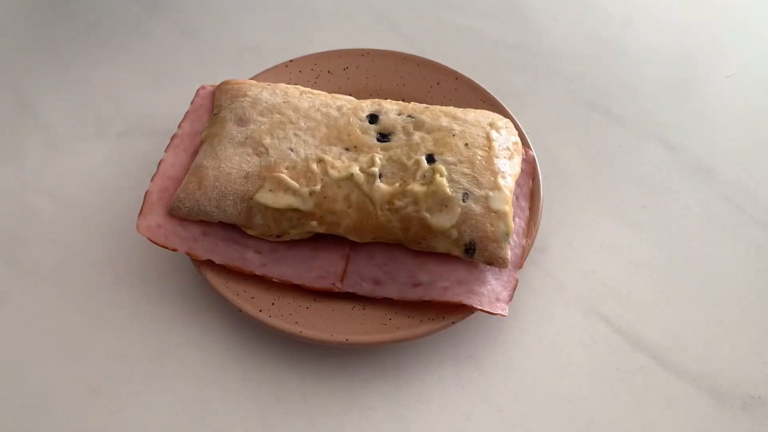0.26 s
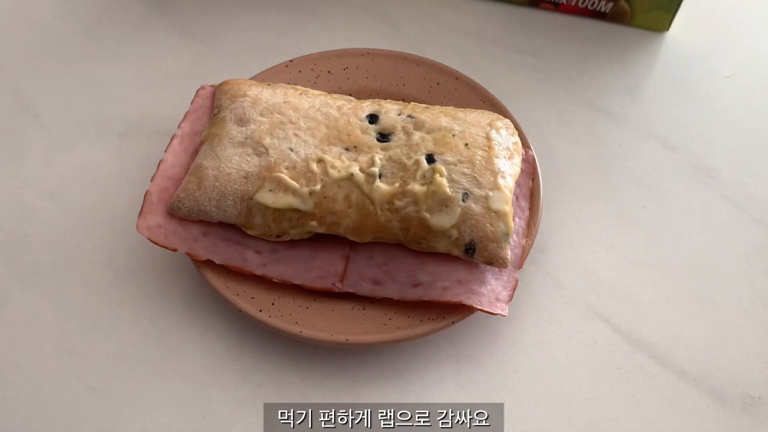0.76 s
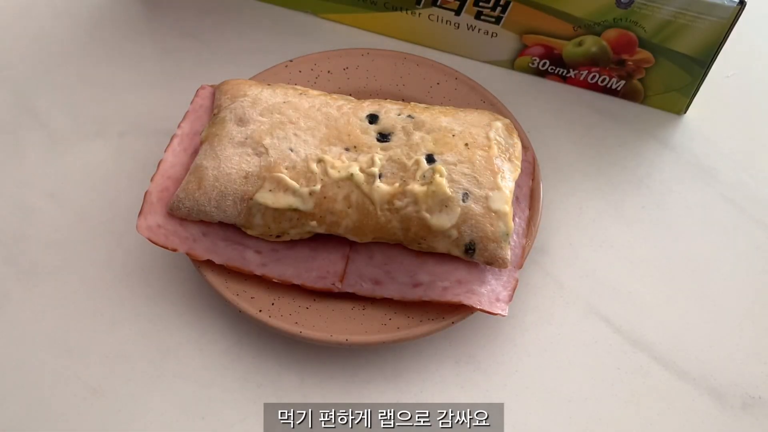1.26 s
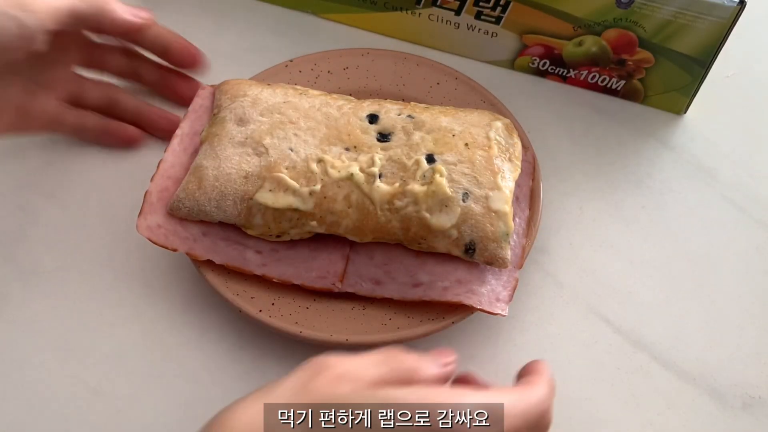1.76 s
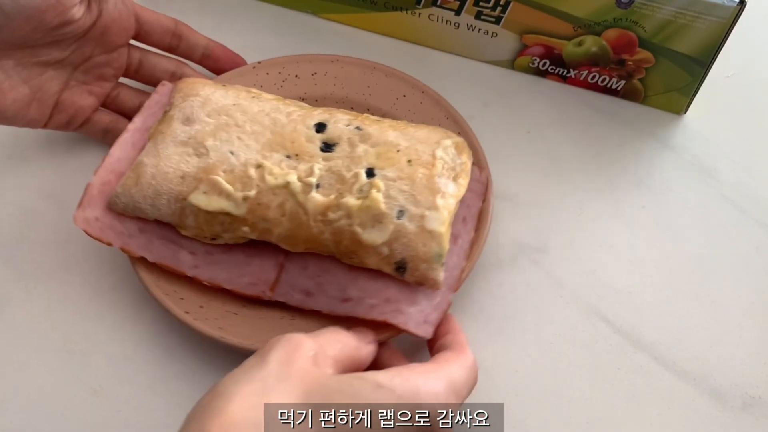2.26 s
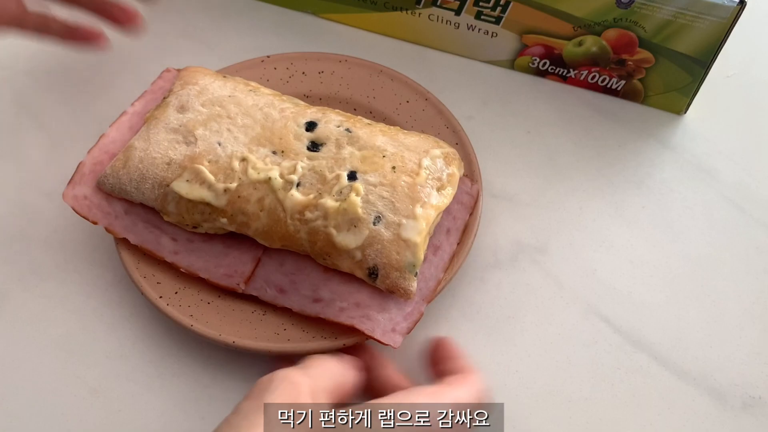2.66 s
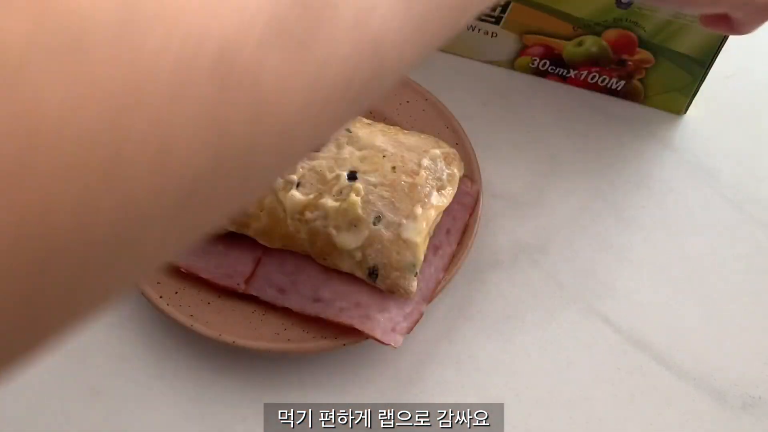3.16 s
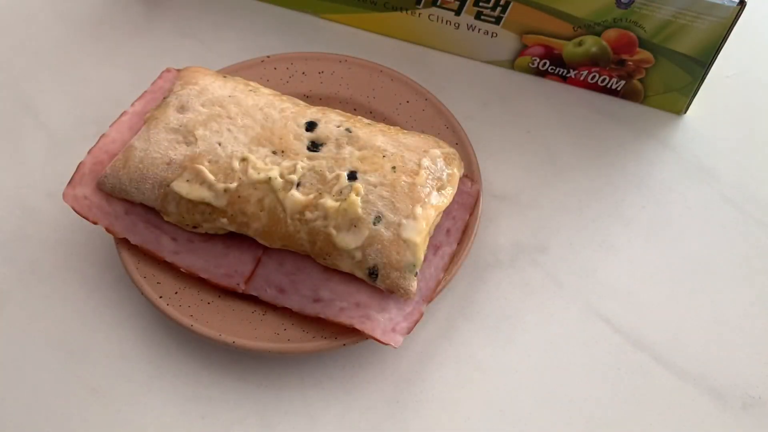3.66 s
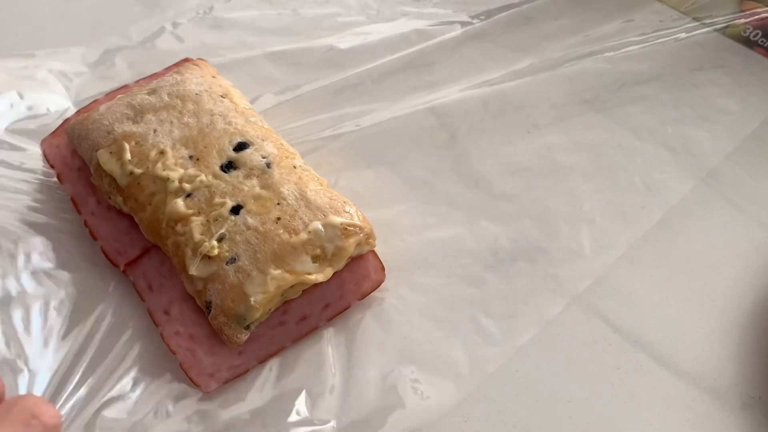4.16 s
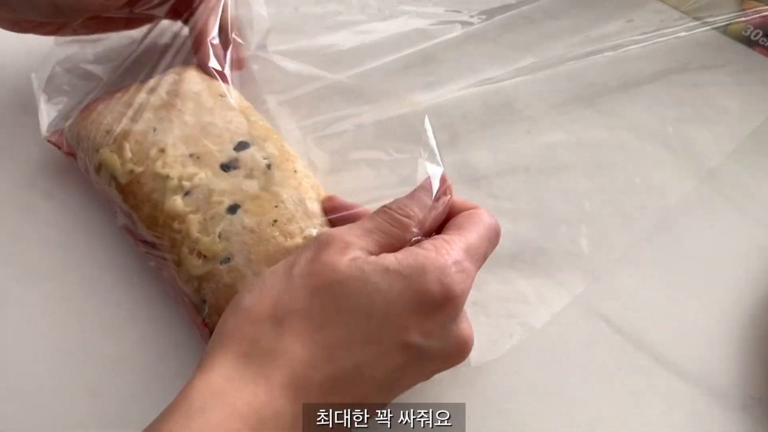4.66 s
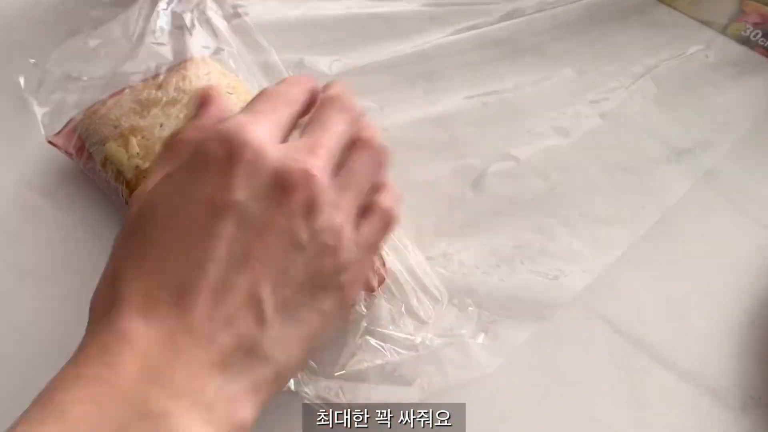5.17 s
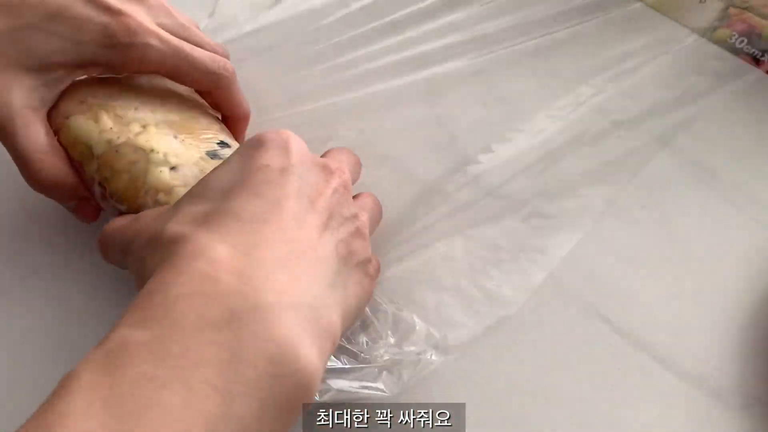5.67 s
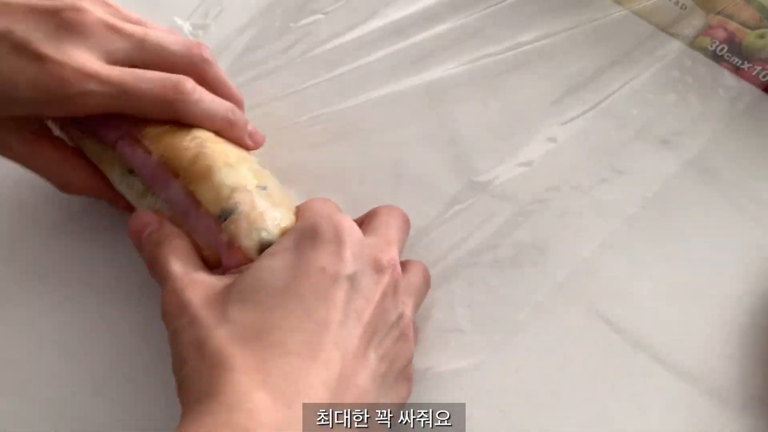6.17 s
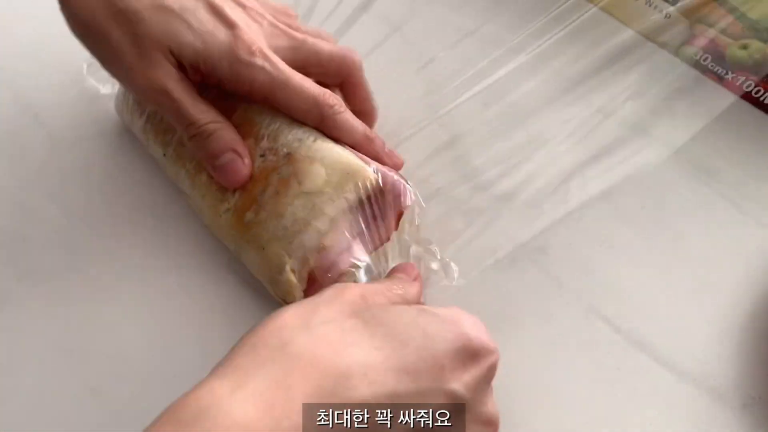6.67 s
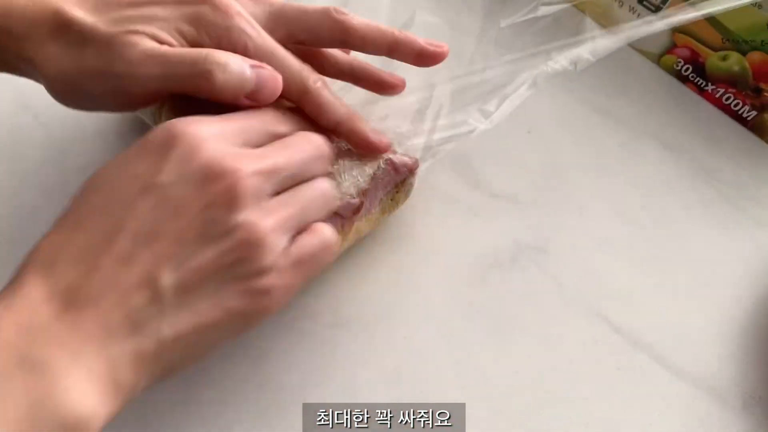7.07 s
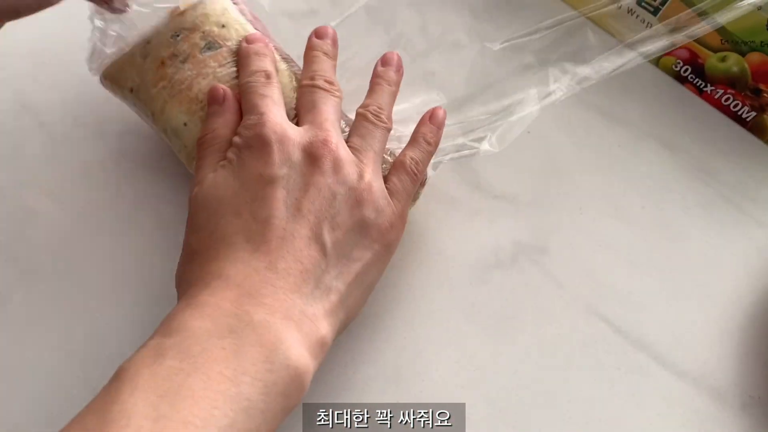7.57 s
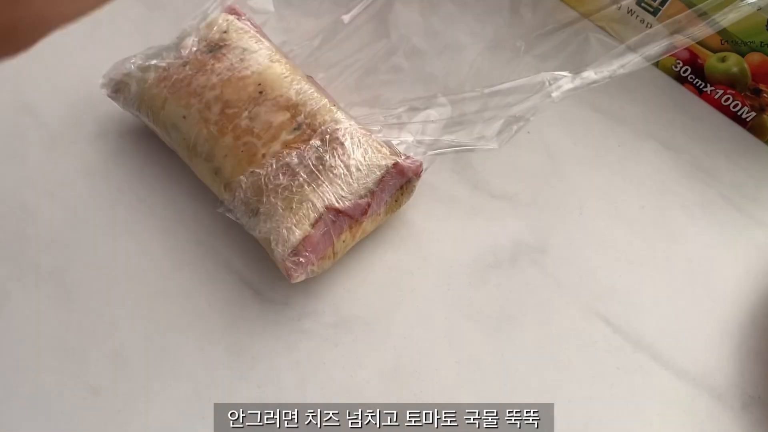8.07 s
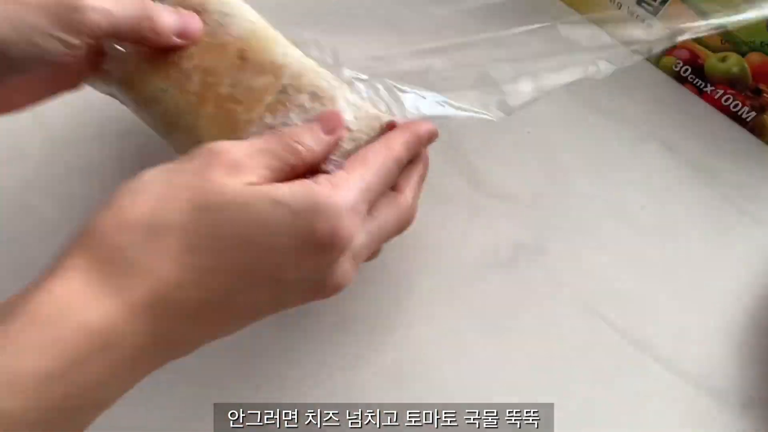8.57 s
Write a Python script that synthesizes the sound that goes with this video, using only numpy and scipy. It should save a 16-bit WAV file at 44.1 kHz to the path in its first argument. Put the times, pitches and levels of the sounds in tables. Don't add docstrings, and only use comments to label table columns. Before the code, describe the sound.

Over a low hum, a light box taps and a plate scrapes on stone, then cling film crackles in close bright bursts with hollow pops.

```python
import sys
import numpy as np
from scipy import signal
from scipy.fft import rfft, irfft, next_fast_len
from scipy.io import wavfile
from scipy.ndimage import uniform_filter1d, minimum_filter1d

SR = 44100
rng = np.random.default_rng(int(sys.argv[2]) if len(sys.argv) > 2 else 0)


def nominal_scale(level):
    x = np.asarray(level, float) / 20
    return 10 ** x


def master(y):
    cut = np.clip(np.atleast_2d(y).T, -1, 1)
    pcm = np.round(cut * 32767)
    wavfile.write(sys.argv[1], SR, pcm.astype(np.int16))


N = 389403

GAP_START_S, GAP_END_S = 4.084, 4.094
EARLY_LEAD_MS, LATE_LEAD_MS = 0.11, 0.026

# start_s, peak_db, pitch_hz
BOX_POPS = [(0.592, -42, 874), (0.744, -41, 840), (0.819, -43.5, 1350), (0.963, -39, 660),
            (1.765, -43, 980), (3.167, -45, 756), (3.208, -40.5, 890), (3.343, -38.5, 716),
            (3.406, -40.5, 720), (3.571, -41.5, 647), (3.59, -37, 940), (3.617, -37.5, 700),
            (3.937, -31, 947)]
# start_s, peak_db, pitch_hz
FILM_POPS = [(4.836, -48, 890), (4.994, -37, 890), (5.009, -33.5, 897), (5.021, -33.5, 940),
             (5.038, -36, 940), (5.423, -40, 907), (5.468, -30, 830), (5.505, -36, 973), (5.558, -33, 950),
             (5.687, -26.5, 895), (5.802, -28, 1020), (5.815, -36.5, 960), (5.87, -39.5, 1010),
             (5.88, -38.5, 960), (5.974, -43, 1050), (6.218, -45, 1130), (6.826, -38, 1100),
             (7.097, -48, 915), (7.109, -36.5, 890), (7.209, -36.5, 930), (7.276, -40.5, 740),
             (8.079, -46, 1210), (8.174, -47, 990), (8.213, -29.5, 987), (8.221, -30, 940),
             (8.23, -39, 1010), (8.246, -21, 920), (8.254, -37, 966), (8.262, -22, 940), (8.272, -26, 1030),
             (8.283, -26.5, 930), (8.313, -28, 1020), (8.496, -48.5, 774), (8.675, -41, 827)]


def evened(x):
    return x / np.sqrt(np.mean(x ** 2) + 1e-20)


def read(points, hz):
    f, value = np.transpose(points)
    return np.interp(np.log(hz + 1), np.log(f + 1), value)


def curves(tables):
    t = np.arange(N) / SR
    out = np.full((len(tables[0][0]) - 1, N), -140.)
    for rows in tables:
        s, *columns = np.transpose(rows)
        inside = (t >= s[0]) & (t <= s[-1])
        out[:, inside] = [np.interp(t[inside], s, c) for c in columns]
    return out


def add(mix, s, sound):
    part = mix[..., max(round(s * SR), 0):][..., :sound.shape[-1]]
    part += sound[..., :part.shape[-1]]


def resonate(x, hz, width_hz):
    return signal.lfilter(*signal.iirpeak(min(hz, SR / 2.2), max(hz / width_hz, .3), SR), x)


def colour(x, db_of_hz):
    gain_db = np.maximum(db_of_hz(abs(np.fft.fftfreq(4096, 1 / SR))), -70)
    log_gain = np.log(nominal_scale(gain_db))
    taps = np.fft.ifft(np.exp(np.conj(signal.hilbert(log_gain)))).real[:2048]
    taps = taps.reshape((1,) * (x.ndim - 1) + (-1,))
    return signal.oaconvolve(x, taps, axes=-1)[..., :x.shape[-1]]


def ring(t, hz, rise_s, t60):
    phase_s = t + 0.0005 * (1 - np.exp(-t / 0.00017))
    wave = np.sin(2 * np.pi * hz * phase_s) * (1 - np.exp(-t / rise_s)) * nominal_scale(-60 * t / t60)
    return wave / abs(wave).max()


def random_side(spread_db, draw):
    return nominal_scale(spread_db * np.tanh(draw) * np.array([[1], [-1]]))


def ports(x, lead_ms):
    # pitch_hz, level_db
    right_db = [(60, 3.5), (200, 5), (700, 4.5), (2500, 4.5), (8000, 4), (15000, 1.5)]
    size = next_fast_len(N)
    hz = np.fft.rfftfreq(size, 1 / SR)
    tilt = nominal_scale(read(right_db, hz) / 2) * np.exp(-1j * np.pi * hz * lead_ms / 1000)
    return irfft(rfft(x * np.ones((2, 1)), size) * [1 / tilt, tilt], size)[:, :N]


def cancelled(x, notches):
    mid, side = (colour(v, lambda hz: sum(db * np.exp(-((hz - f) / w) ** 2) for f, w, db in dips))
                 for v, dips in zip((x[0] + x[1], x[0] - x[1]), notches))
    return np.array([mid + side, mid - side]) / 2


def air(tone, level_db, patchy_db):
    # pitch_hz, share
    likeness = [(60, 0.71), (200, 0.87), (600, 0.42), (2000, -0.69), (8000, 0.0093), (15000, -0.36)]
    frames, hz = N // 256 + 5, np.fft.rfftfreq(1024, 1 / SR)
    a, b, c, d, patches = rng.standard_normal((frames, 513, 5)).T
    patches = evened(uniform_filter1d(uniform_filter1d(patches, size=10, axis=0), size=12, axis=1))
    same = np.clip(read(likeness, hz), -1, 1)[:, None]
    left = a + 1j * b
    z = np.array([left, same * left + np.sqrt(1 - same ** 2) * (c + 1j * d)])
    z *= nominal_scale(read(tone, hz)[:, None] + patchy_db * patches / (1 + hz[:, None] / 2000))
    return nominal_scale(level_db) * evened(signal.istft(z, nperseg=1024, noverlap=768)[1][:, :N])


def hums(late):
    # time_s, level_db
    deep_level = [(0, -54.5), (.3, -61.5), (.55, -52.5), (2.5, -54.5), (4.09, -53.5)]
    # pitch_hz, rms_db
    motor_tones = [(159, -54.5), (318, -73.5)]
    deep_hz, width_hz = 53.1, 0.56
    t = np.arange(N) / SR
    fuzz = resonate(rng.standard_normal(N), deep_hz, width_hz * 4)
    fuzz = evened(resonate(fuzz, deep_hz, width_hz * 4))
    deep = evened(np.sin(2 * np.pi * deep_hz * t) + 0.11 * fuzz) * nominal_scale(curves([deep_level])[0])
    beat = nominal_scale(1.0 * evened(resonate(rng.standard_normal(N), 8.0, 1.2)))
    motor = sum(nominal_scale(db) * np.sqrt(2) * np.sin(2 * np.pi * hz * t) for hz, db in motor_tones) * beat
    return np.where(late, motor, deep)


def kitchen(x):
    # pitch_hz, t60_s
    decay = [(150, 0.22), (1000, 0.17), (4000, 0.19), (12000, 0.012)]
    taps = np.zeros((2, SR // 2))
    at = np.arange(100, SR // 2 - 20, 20) + rng.integers(0, 20, (2, (SR // 2 - 101) // 20))
    np.put_along_axis(taps, at, rng.choice([-1., 1.], at.shape), 1)
    hz, t, z = signal.stft(taps, SR, nperseg=256)
    tail = signal.istft(z * nominal_scale(-60 * t / read(decay, hz)[:, None]), SR, nperseg=256)[1]
    bass = signal.lfilter(*signal.butter(1, 900, fs=SR), tail[0] - tail[1])
    tail[1] += bass
    return signal.oaconvolve(x.mean(0)[None], tail / np.linalg.norm(tail[0]), axes=1)[:, :N]


def thumps():
    # start_s, peak_db, pitch_hz
    blows = [(0.715, -35, 104.5), (1.146, -40, 153), (3.212, -45, 180), (3.38, -43, 181), (0.967, -34, 136),
             (3.013, -26, 315), (1.769, -37, 140), (2.279, -45, 130), (3.167, -40.5, 163),
             (4.185, -57, 65.5), (7.388, -47, 79.5), (7.4, -29.5, 213), (8.05, -67, 74.4), (8.12, -66, 66),
             (8.19, -63, 70), (8.673, -31, 202)]
    out, t = np.zeros((2, N)), np.arange(9000) / SR
    for s, db, hz in blows:
        t60 = 8.4 / hz
        add(out, s, nominal_scale(db) * ring(t, hz, 0.018, t60) * signal.windows.tukey(len(t), .3))
    return out


def knocks():
    # start_s, peak_db, pitch_hz
    dull_knocks = [(0.71, -41.5, 291), (0.895, -50, 200), (0.965, -31.5, 295), (1.052, -47, 444),
                   (1.112, -48.5, 290), (1.143, -46, 340), (1.77, -52, 328), (2.274, -50, 383),
                   (3.011, -52, 472), (3.164, -43.5, 328), (3.347, -46.5, 310), (3.406, -53, 343),
                   (3.589, -44.5, 330), (3.619, -41, 315), (3.942, -48, 290), (4.03, -55.5, 298),
                   (4.277, -56, 278), (8.285, -47, 490), (8.5, -57.5, 397), (8.674, -54, 356)]
    out, t = np.zeros((2, N)), np.arange(9000) / SR
    for (s, db, hz), (upper, lower) in zip(dull_knocks, rng.random((len(dull_knocks), 2))):
        knock = ring(t, hz, 0.001, 0.028)
        knock += 0.31 * ring(t, hz * (1.26 + 0.94 * upper), 0.0015, 0.025)
        knock += 0.11 * (s < GAP_START_S) * ring(t, 65 + 110 * lower, 0.0045, 0.067)
        add(out, s, nominal_scale(db + 11.0) * knock)
    return out


def push():
    pushes = [
        (1.938, -56, 0.054, 0.029),
        (2.03, -45.5, 0.079, 0.26),
        (2.291, -52.5, 0.17, 0.17),
        (2.6, -55, 0.076, 0.062),
    ]
    fall_db, bend = 23, 1.59
    t = np.arange(N) / SR
    return np.max([db - fall_db * np.where(t < s, (s - t) / rise, (t - s) / fall) ** bend
                   for s, db, rise, fall in pushes], axis=0)


def plate():
    # pitch_hz, width_hz, level_db
    modes = [(450, 40, 13.5), (700, 380, 18), (910, 21, 18), (1296, 21, 16), (1520, 31, 13), (1796, 39, 11),
             (2080, 34, -6), (2740, 42, 14), (3400, 57, -6), (4330, 100, -0.5), (5570, 55, 2.5),
             (6220, 230, -10), (7500, 55, -2), (8600, 91, -2)]
    level_db = push()
    brighter_db = 0.8 * np.maximum(level_db - level_db.max(), -25)
    struck = rng.random(N) < 3000 / SR
    grit = nominal_scale(3 * np.minimum(rng.exponential(1, N), 2.5)) * struck * rng.standard_normal(N)
    grit = evened(grit) + 1.25 * rng.standard_normal(N)
    grit = grit * nominal_scale(1.7 * evened(resonate(rng.standard_normal(N), 29, 60)))
    wander = evened(resonate(resonate(grit, 12, 14), 14, 24))
    low, high = np.zeros(N), np.zeros(N)
    for k, (hz, width, db) in enumerate(modes):
        mode = resonate(resonate(grit, hz, 1.54 * width), hz, 510)
        part = high if hz > 3300 else low
        part += nominal_scale(db + 3.8 * np.roll(wander, 9001 * k)) * mode
    broad = resonate(grit, 1980, 1000)
    broad = evened(signal.sosfilt(signal.butter(6, 2950, fs=SR, output="sos"), broad))
    treble = evened(high) + 0.95 * evened(resonate(grit, 4100, 1200))
    treble = signal.sosfilt(signal.butter(8, 9100, fs=SR, output="sos"), treble)
    body = evened(low) + 0.81 * broad * nominal_scale(.5 * brighter_db)
    return nominal_scale(level_db) * (body + nominal_scale(brighter_db - 7.5) * treble)


def pops():
    out, t = np.zeros((2, N)), np.arange(9000) / SR
    for s, db, hz in list(BOX_POPS) + list(FILM_POPS):
        phase_s = 2.1 * t + 0.0045 * (1 - np.exp(-t / 0.00095))
        sweep = np.sin(2 * np.pi * hz * phase_s) * nominal_scale(-60 * t / 0.056)
        add(out, s, nominal_scale(db - 1.5) * (ring(t, hz, 0.000098, 0.03) + nominal_scale(-13.5) * sweep))
    return out


def ticks():
    # start_s, peak_db, centre_hz
    stretch_ticks = [(3.2395, -53, 1560), (3.2555, -60, 560), (3.3084, -54, 1520), (4.149, -45, 5210),
                     (4.2755, -36, 7440), (4.322, -38, 3900), (4.394, -40, 2140), (4.464, -48, 6850),
                     (4.4732, -43, 9300), (4.5151, -42.5, 3960), (4.576, -48, 3970), (4.6418, -38.5, 4000),
                     (4.677, -42, 5450), (4.7501, -43, 5280), (4.787, -45, 3450), (4.8094, -43, 4750),
                     (4.8349, -37, 2060), (4.895, -41, 9600), (4.9337, -35, 3900), (4.9424, -40.5, 2770),
                     (4.991, -44, 4960), (5.017, -42, 1990), (5.5902, -37, 3860), (5.7027, -30, 2660),
                     (5.7284, -44, 2780), (5.7606, -32.5, 3780), (5.8774, -25.5, 2460), (5.9179, -39, 2590),
                     (5.974, -31, 2560), (6.0487, -34, 3960), (6.0856, -40, 5220), (6.1115, -48.5, 1980),
                     (6.1535, -37, 3900), (6.2157, -37, 3200), (6.2224, -42, 5930), (6.383, -39, 9800),
                     (6.5041, -39, 1940), (6.5395, -35, 4660), (6.549, -25, 10600), (6.5835, -49, 4270),
                     (6.6752, -43, 4800), (6.795, -34, 4300), (6.8848, -30.5, 3080), (6.9147, -46, 7650),
                     (6.9364, -32.5, 1780), (7.0177, -27, 10600), (7.0246, -39, 4560), (7.0953, -34, 10100),
                     (7.2072, -39, 1490), (7.2774, -34, 1490), (7.3714, -23, 4740), (7.3944, -25, 3890),
                     (7.4957, -31, 6060)]
    # start_s, peak_db, centre_hz
    tuck_ticks = [(7.5494, -40, 4380), (7.566, -32.5, 5990), (7.6096, -36, 2450), (7.6215, -33, 6800),
                  (7.7697, -38, 2260), (7.8012, -36.5, 5050), (7.8155, -44, 4210), (8.078, -41, 2800),
                  (8.1414, -46, 4650), (8.1529, -44, 2740), (8.1753, -28, 1500), (8.2364, -27, 2620),
                  (8.4956, -37, 1600), (8.674, -39, 3000)]
    # start_s, peak_db, centre_hz
    further_ticks = [(3.4042, -27, 4140), (3.4315, -42, 7000), (3.417, -44, 4300), (3.47, -44, 2300),
                     (5.949, -39, 2520), (5.9844, -46, 2560), (8.262, -31, 2530), (8.2744, -26, 3010),
                     (8.287, -33, 3050), (8.2974, -20, 2740), (8.3214, -33, 3610), (8.331, -37, 2380),
                     (3.4895, -46, 9500), (3.795, -39, 5530), (3.837, -35.5, 8150), (3.852, -41, 8500),
                     (3.951, -36, 8600), (3.992, -42, 7500), (4.021, -37, 9200), (5.393, -46, 2500),
                     (8.376, -55, 9500), (8.391, -58, 13000), (8.441, -56, 7500), (8.489, -62, 11000)]
    rows = list(stretch_ticks) + list(tuck_ticks) + list(further_ticks)
    out, t = np.zeros((2, N)), np.arange(900) / SR
    for (s, db, hz), noise in zip(rows, rng.standard_normal((len(rows), 901))):
        puff = noise[1:] * nominal_scale(-60 * t / 0.019)
        puff = resonate(resonate(puff, hz, 0.19 * hz), hz, hz) + 0.098 * np.diff(puff, prepend=0)
        add(out, s, nominal_scale(db - 5) * puff / abs(puff).max() * random_side(6.2, noise[0]))
    return out


def snaps():
    # start_s, peak_db, centre_hz
    roll_snaps = [(0.7103, -39.5, 6950), (0.965, -28, 6700), (1.074, -21, 9250), (1.1327, -38, 8800),
                  (3.3463, -36, 6660), (3.3817, -34.5, 8100), (3.4034, -23, 8140), (3.472, -43, 7240),
                  (3.5692, -22, 5700), (3.5905, -11, 8900), (3.6014, -14, 8600), (3.6163, -9.5, 7300),
                  (3.638, -20, 7700), (4.0602, -26, 8800)]
    # start_s, peak_db, centre_hz
    film_snaps = [(5.0775, -25, 6730), (5.0939, -24, 8500), (5.4672, -26, 7050), (5.5018, -18, 4220),
                  (5.5582, -26, 3200), (5.6854, -20.5, 3720), (5.801, -29.5, 4870), (6.5638, -23, 9800),
                  (6.5987, -21, 6950), (6.6967, -21.5, 8000), (6.7408, -23, 8350), (6.813, -39, 7500),
                  (6.825, -17, 5300), (6.8441, -22, 5260), (7.1086, -30, 8600), (7.3853, -25, 6070),
                  (7.4089, -21.5, 5800), (7.429, -27, 7500), (7.5105, -22.5, 6000), (7.6584, -26, 8700),
                  (7.6883, -28.5, 9700), (7.7436, -31.5, 5740), (8.2081, -13, 6300), (8.2318, -16, 7000),
                  (8.2619, -19, 5200), (8.3118, -14.5, 3470)]
    rows = list(roll_snaps) + list(film_snaps)
    out, t = np.zeros((2, N)), np.arange(900) / SR
    for (s, db, hz), noise in zip(rows, rng.standard_normal((len(rows), 901))):
        puff = noise[1:] * (nominal_scale(-60 * t / 0.0085) + 0.14 * nominal_scale(-60 * t / 0.05))
        puff = np.diff(puff, prepend=0) * hz / 24000 + 0.49 * resonate(puff, hz, .5 * hz)
        add(out, s, nominal_scale(db + 0.85) * puff / abs(puff).max() * random_side(2.5, noise[0]))
    return out


def effort(layers_db, bursts, crease):
    # time_s, crackle_db
    rustle = [
        [(0.47, -96), (0.525, -67.5), (0.56, -104), (0.896, -77), (1.0, -59), (1.16, -68), (1.23, -89)],
        [(2.999, -102), (3.286, -77), (3.47, -52), (3.538, -85), (3.563, -64), (3.875, -62), (4.084, -52.5)],
        [(4.095, -67), (4.55, -62), (5.1, -60.5), (5.84, -55), (6.45, -61.5), (6.8, -53), (7.13, -67.5),
         (7.5, -51), (8, -63), (8.22, -62), (8.6, -57.5), (8.83, -70)],
    ]
    # start_s, length_s, drop_db
    pauses = [(4.36, 0.1, 7), (4.533, 0.06, 8.5), (5.186, 0.047, 21), (5.235, 0.044, 13), (5.6, 0.032, 3.5),
              (6.101, 0.045, 13), (6.623, 0.046, 17), (7.161, 0.021, 14), (7.438, 0.052, 15),
              (7.84, 0.12, 6), (7.997, 0.032, 9), (8.359, 0.14, 23)]
    fade_s, edge_s = 0.0086, 0.0029
    t = np.arange(N) / SR
    pop_starts = np.array([row[0] for row in list(BOX_POPS) + list(FILM_POPS)])
    still_db = sum(db * np.clip(np.minimum((t - s) / fade_s, (s + length - t) / edge_s), 0, 1)
                   for s, length, db in pauses)
    power = nominal_scale(2 * (curves(rustle) - still_db + np.array([0, *layers_db])[:, None]))
    for s, length, db, hollow_db in bursts:
        u = np.linspace(-1.8, 1.8, round(1.8 * length * SR))
        shape_db = db + 5.5 - np.where(u < 0, 11, 8) * abs(u) ** 2.86
        if abs(pop_starts - s - .004).min() < .009:
            shape_db = db - 4.6 * u - np.where(u < -.7, 150 * (-.7 - u), 3 * np.maximum(u, 0) ** 3)
        layers = np.array([[0], [crease[0] + crease[1] * hollow_db], [hollow_db]])
        add(power, s - .4 * length, nominal_scale(2 * (shape_db + layers)))
    return np.sqrt(power)


def crackle(tone, gains, lead_ms, per_s, spread_db, hiss, pocket_hz, pocket_width_hz, spread_ms, taut):
    clumps = nominal_scale(2.2 * evened(resonate(rng.standard_normal(N), 49, 80)))
    t, drive = np.arange(300) / SR, np.zeros((2, N))
    for place in np.linspace(-1, 1, 6):
        turn = nominal_scale(5.5 * evened(resonate(rng.standard_normal(N), 10, 18)))
        let_go = rng.random(N) < per_s * clumps * turn / SR / 6
        clicks = nominal_scale(spread_db * np.minimum(rng.exponential(1, N), 3.4)) * let_go
        bursts = evened(signal.oaconvolve(clicks, nominal_scale(-60 * t / .005))[:N])
        burst = rng.standard_normal(N) * (bursts + hiss * evened(turn * np.sqrt(clumps)))
        burst = resonate(burst, 6000 * 2.2 ** place, 2200 * 1.6 ** place) + 0.18 * burst
        drive += ports(evened(burst), lead_ms + spread_ms * place)
    drive = evened(drive / uniform_filter1d((drive ** 2).mean(0) + 1e-9, size=1800) ** .27)
    slack = nominal_scale(2.2 * evened(resonate(rng.standard_normal(N), 8.2, 9)))
    high = evened(colour(drive, lambda hz: read([(1500, -69.5)] + list(tone), hz)))
    crease = resonate(resonate(drive, 1800, 1800), 2300, 2200)
    crease = crease + 1.5 * resonate(drive, 2550, 120) + taut * resonate(drive, 3900, 250)
    crease = -evened(crease)
    pocket = resonate(resonate(drive, pocket_hz, pocket_width_hz), pocket_hz, 1400)
    pocket = evened(pocket - .5 * resonate(resonate(drive, 432, 246), 380, 570))
    return (gains[:, None] * [high, evened(crease * slack), pocket]).sum(0)


def scene():
    # pitch_hz, level_db per Hz
    early_air, late_air, late_rumble = [(44, -30), (75, -8.5), (147, -20.5), (300, -24), (1000, -34.5),
                                        (4300, -53), (9000, -44), (14800, -55.5)], [(190, 3), (246, -5.5), (527, -13.5), (1490, -18.5),
                                                       (3200, -22), (3900, -32), (11900, -52), (16000, -26)], [(30, -60), (60, -29), (80, -40),
                                                                      (130, -8.5)]
    # pitch_hz, level_db per Hz
    box_tone, film_tone = [(2500, -8.5), (3900, -3), (5000, -2), (7300, 3), (10500, 0), (12000, -5.5),
                           (15200, -2.5), (16300, 7)], [(1470, 0), (2500, -15.5), (3400, -9), (3900, -7), (6200, -6.5),
                                             (13500, 0), (15600, -13), (16500, -71)]
    # start_s, length_s, crackle_db, hollowness_db (air pocket against crackle)
    roll_bursts, film_bursts = [(0.566, 0.053, -90, 29.5), (0.704, 0.031, -67.5, 13.5),
                                (0.805, 0.031, -76, 12), (0.887, 0.036, -71, 8), (0.956, 0.061, -56, 7.5),
                                (1.052, 0.034, -49.5, -6), (1.104, 0.05, -61, 4), (1.759, 0.031, -65, 8.5),
                                (3.005, 0.02, -86.5, 23), (3.076, 0.089, -96, 23.5),
                                (3.425, 0.051, -74.5, 4), (3.152, 0.032, -76, 16.5), (3.2, 0.1, -89.5, 31),
                                (3.32, 0.075, -69, 4), (3.395, 0.043, -58, 2.5), (3.579, 0.038, -50.5, -4),
                                (3.62, 0.071, -48, -13), (3.733, 0.019, -57.5, -20),
                                (3.787, 0.041, -61.5, -21), (3.925, 0.04, -60.5, 11.5),
                                (3.963, 0.084, -59.5, 0)], [(4.14, 0.058, -58, -14), (4.257, 0.094, -55.5, -11.5),
                                                     (4.978, 0.088, -49, -10), (5.066, 0.028, -42.5, -15.5),
                                                     (4.926, 0.036, -52.5, -11.5), (5.455, 0.082, -57, 0),
                                                     (5.502, 0.017, -44, 3.5), (5.675, 0.06, -47.5, -7),
                                                     (5.756, 0.062, -54, -9), (5.861, 0.017, -45, -9),
                                                     (5.918, 0.071, -64, 3.5), (6.203, 0.16, -58.5, -7),
                                                     (6.49, 0.12, -54, -9), (6.671, 0.049, -54.5, -9),
                                                     (6.728, 0.024, -45.5, -31), (6.789, 0.071, -43, -19.5),
                                                     (6.86, 0.09, -53, -11.5), (6.987, 0.08, -56.5, -14.5),
                                                     (7.082, 0.048, -53, -7), (7.196, 0.03, -52, -3),
                                                     (7.362, 0.071, -41.5, -13.5),
                                                     (7.5, 0.028, -46.5, -9.5), (7.554, 0.042, -52, -23),
                                                     (7.801, 0.031, -55, -9), (8.066, 0.063, -57, -7),
                                                     (8.16, 0.17, -49, -7.5), (8.222, 0.087, -36.5, -1),
                                                     (8.51, 0.036, -57.5, -26), (8.66, 0.12, -62.5, -25)]
    # crease_db, air_pocket_db
    rustle_layers = (-11.5, -7.5), (-26, -10)
    # level_db, db per db of hollowness
    crease_layers = (-4.5, 0.17), (-7.5, 0.98)
    # centre_hz, width_hz, depth_db
    early_notches = [
        [(5050, 300, -3), (12400, 650, -9)],
        [(8350, 650, -12), (16000, 800, -10)],
    ]
    late_notches = [
        [(13000, 670, -2.5)],
        [(7000, 3800, -1.4)],
    ]
    # time_s, level_db
    settle = [(0, -1), (.2, -3), (.38, -1), (.6, 0.5), (2.8, 0.5), (3.2, 2)]

    t = np.arange(N) / SR
    late = t > GAP_END_S
    struck = thumps() + knocks() + pops() + snaps()
    struck = signal.lfilter(*signal.butter(2, 45, "high", fs=SR), struck)

    early_near = ports(struck + plate() + ticks(), EARLY_LEAD_MS)
    early_gains = effort(rustle_layers[0], roll_bursts, crease_layers[0])
    early_near += crackle(box_tone, early_gains, EARLY_LEAD_MS, per_s=500, spread_db=5.3, hiss=1.2,
                          pocket_hz=890, pocket_width_hz=256, spread_ms=0.033, taut=0.41)
    early_near = early_near * ~late
    early = early_near + nominal_scale(-9.5) * kitchen(early_near)
    early += air(early_air, -63, 2.65) * nominal_scale(np.interp(t, *np.transpose(settle)))
    early = cancelled(early, early_notches)

    late_gains = effort(rustle_layers[1], film_bursts, crease_layers[1])
    late_near = ports(struck, LATE_LEAD_MS)
    late_near += crackle(film_tone, late_gains, LATE_LEAD_MS, per_s=350, spread_db=4.55, hiss=2.15,
                         pocket_hz=935, pocket_width_hz=203, spread_ms=0.032, taut=0.92)
    late_near = late_near * late
    later = late_near + 0.11 * kitchen(late_near)
    later += air(list(late_rumble) + list(late_air), -61.5, 1.9)
    later = cancelled(later + ports(ticks(), LATE_LEAD_MS) * late, late_notches)

    mix = np.where(late, later, early) + hums(late)
    add(mix, .1655 - .001, nominal_scale(-44.5) * signal.windows.exponential(90, tau=12))
    gap = [GAP_START_S, GAP_START_S + .001, GAP_END_S - .001, GAP_END_S]
    return mix * np.interp(t, gap, [1, .03, .03, 1])


def starved(x):
    # low_hz, high_hz, margin_db
    weak_bands = [
        [(9200, 10800, 38), (10800, 11700, 39), (11700, 13100, 17), (13100, 14000, 42), (14500, 15300, 46)],
        [(7700, 9000, 20), (9000, 9700, 31), (10200, 11200, 41), (14300, 15200, 36), (15200, 16500, 18)],
    ]
    hz, t, z = signal.stft([x[0] + x[1], x[0] - x[1]], SR, nperseg=1024, noverlap=512)
    early = t < GAP_START_S

    def level_db(v, lo, hi):
        power = (abs(v[(hz > lo) & (hz <= hi)]) ** 2).sum(0)
        return 10 * np.log10(uniform_filter1d(power, size=3) + 1e-20)

    keep, body_db = np.ones(z.shape), level_db(z[0], 300, 11000)
    for k, bands in enumerate(weak_bands):
        for lo, hi, margin_db in bands:
            above = np.clip((level_db(z[k], lo, hi) - body_db + margin_db) / 2, .01, 1)
            keep[k, (hz > lo) & (hz <= hi)] = np.where(early, above, 1)
    dip_db = level_db(z[0], 4750, 5350)
    masked = (dip_db < level_db(z[0], 5500, 9000) - 10) | (dip_db < body_db - 33)
    masked = masked & (body_db > -57) & early
    keep[0, (hz > 4750) & (hz <= 5350)] = np.where(masked, .01, 1)
    edge = uniform_filter1d(np.diff(x[0] + x[1], 2) ** 2, size=64) + 1e-20
    sudden = -minimum_filter1d(-edge, size=1200) / uniform_filter1d(edge, size=1200) > 5.5
    keep[..., np.interp(t * SR, np.arange(len(edge)), sudden) > .5] = 1
    mid, side = signal.istft(z * keep, SR, nperseg=1024, noverlap=512)[1][:, :N]
    return np.array([mid + side, mid - side]) / 2


def band_limit(x):
    return signal.sosfilt(signal.butter(12, 16990, fs=SR, output="sos"), x)


def record(dry):
    lowpass = signal.firwin(255, 16100, window=("kaiser", 4), fs=SR)
    limited = signal.oaconvolve(starved(dry), lowpass[None], "same")
    return band_limit(limited)


dry = scene()
out = record(dry)
master(out)
```